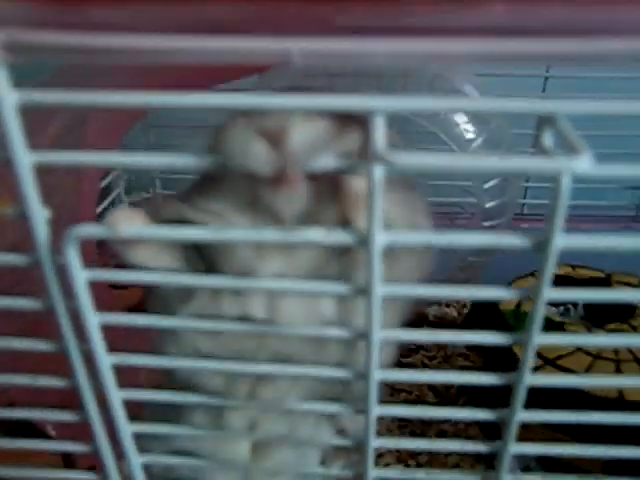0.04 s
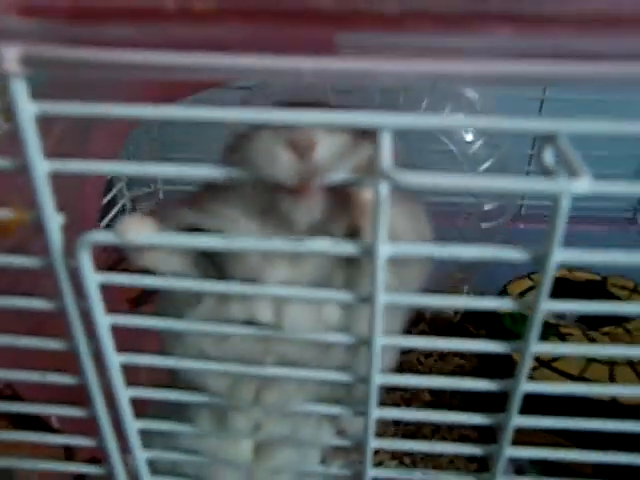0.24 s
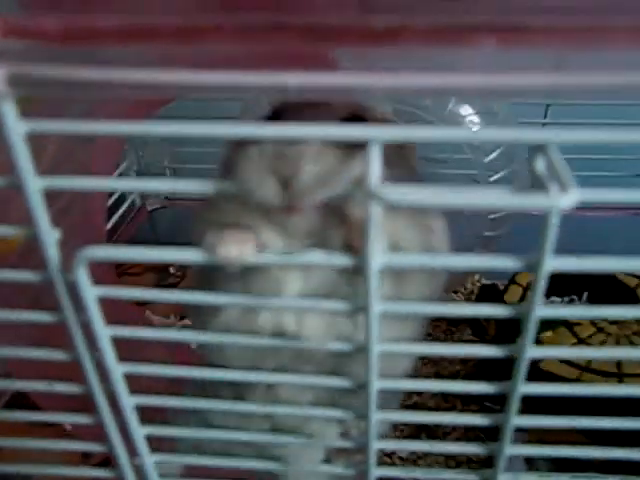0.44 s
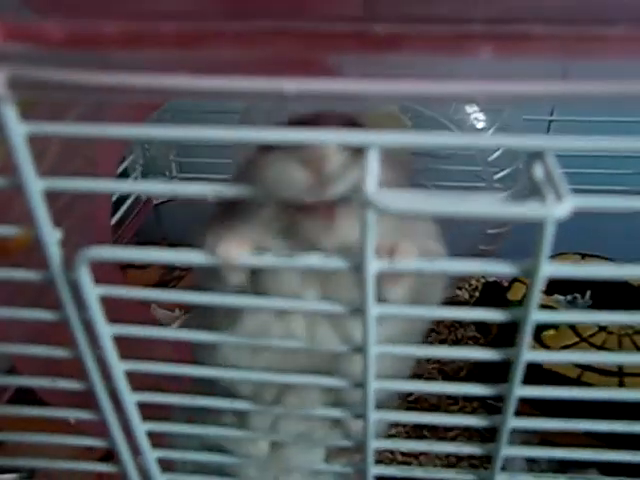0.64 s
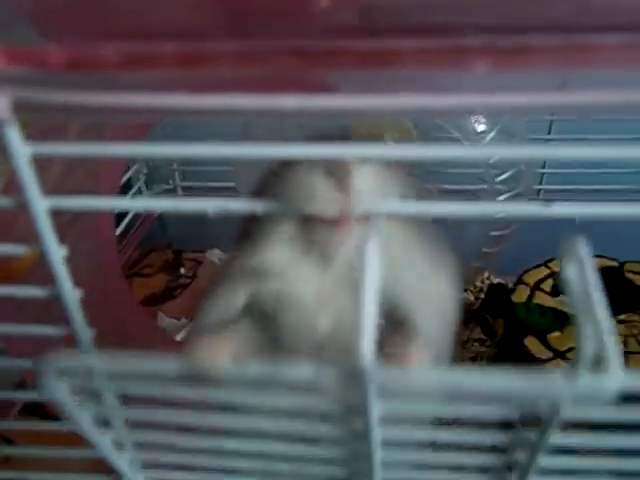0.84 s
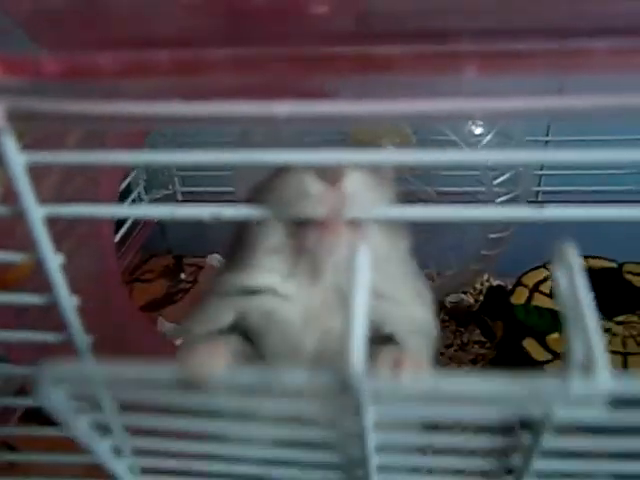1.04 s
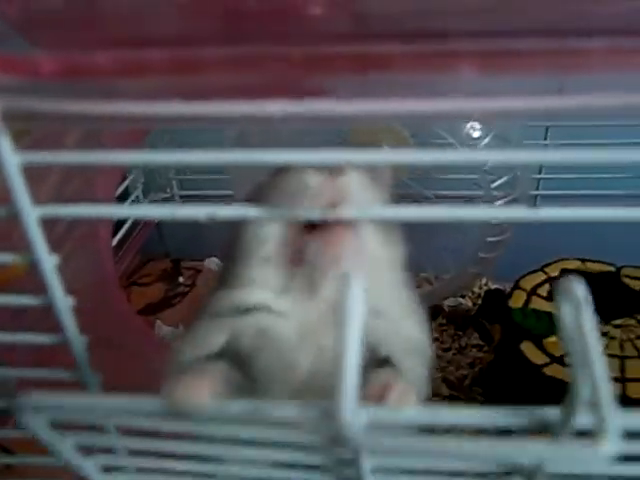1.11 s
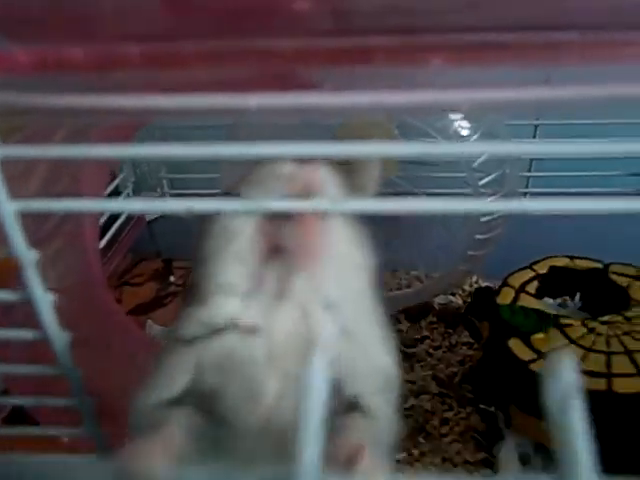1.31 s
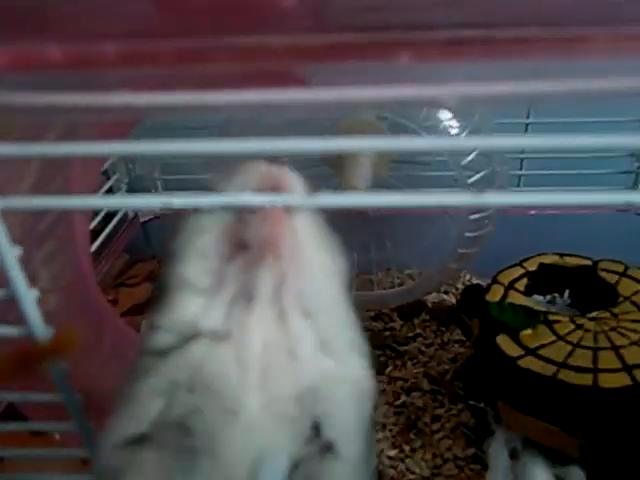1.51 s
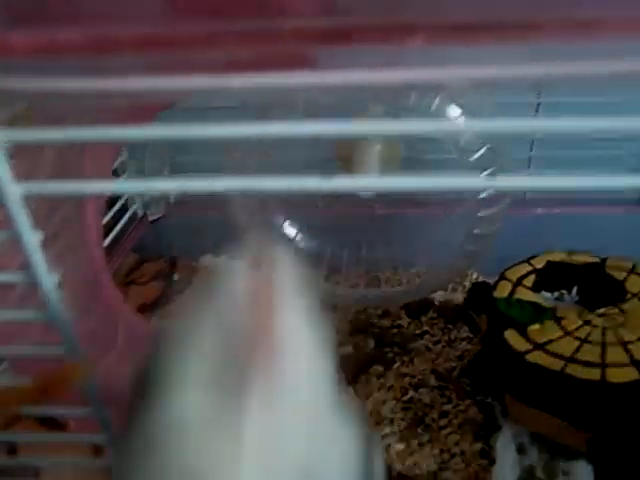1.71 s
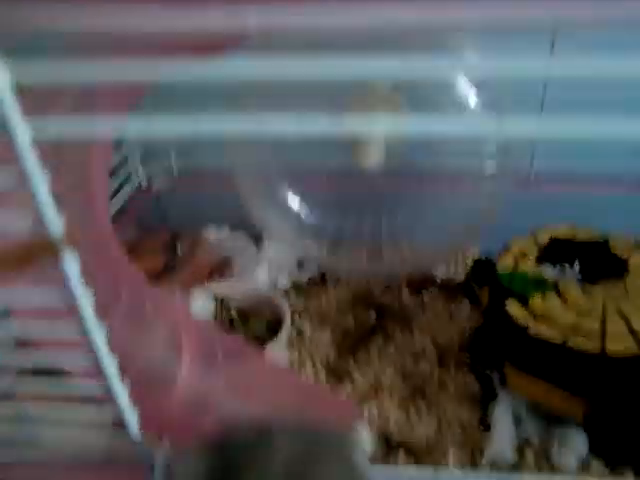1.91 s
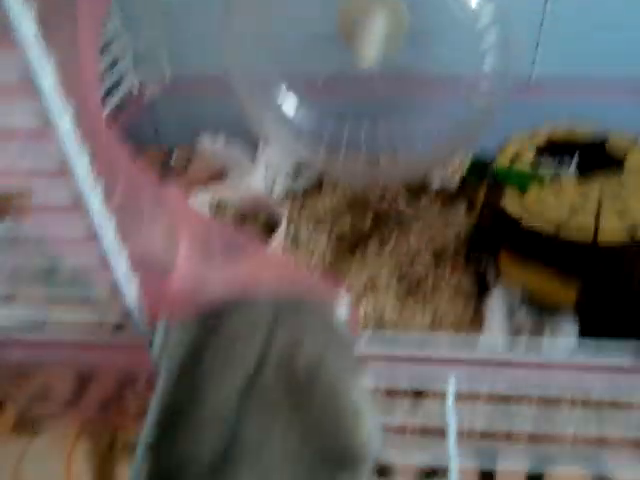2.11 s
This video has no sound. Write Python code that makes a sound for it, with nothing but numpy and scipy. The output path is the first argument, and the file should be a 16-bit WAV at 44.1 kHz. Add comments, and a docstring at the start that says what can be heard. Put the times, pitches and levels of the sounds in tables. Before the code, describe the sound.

A wire cage door rattles and clicks as a hamster tugs at it, then springs free with a loud, ringing clank. Light paw taps and a heavy knock follow, close by in a small room.

```python
"""Over the low rumble of a small room, a hamster tugs at the wire door of its cage, close by.
The door chatters in its catch, each impact exciting damped modes of door and bars; dry ticks and
dull knocks of the plastic tub fall in between. Near 0.8 s the door slips free and lands with a clank,
and the bars ring on, beating against one another. From 1 s paws tap the bars among a few more ticks,
and near 1.84 s a last heavy knock sets the tub and the cage vibrating."""
import sys
import numpy as np
from scipy import signal
from scipy.fft import rfft, irfft, next_fast_len
from scipy.io import wavfile

SR = 44100
rng = np.random.default_rng(int(sys.argv[2]) if len(sys.argv) > 2 else 0)


def store_pcm(level_fs):
    """Save levels as 16-bit WAV."""
    pcm = np.round(np.clip(level_fs, -1, 1) * 32767).astype(np.int16)
    wavfile.write(sys.argv[1], SR, np.atleast_2d(pcm).T)


N = 94815

# background noise spectrum: f/Hz, relative level/dB
AIR_SPECTRUM = [(12, -1), (20, -8.5), (109, -7), (161, -6.5), (196, -10.5), (252, -13), (565, -21),
                (906, -19), (1300, -24), (2470, -30), (2920, -31), (4950, -34.5), (15500, -40)]
# blows on the door: t/s, level/dB, bass/dB, treble/dB, ring of the bars/dB, decay time factor
DOOR_BLOWS = [(0.0, -27.5, 1.5, -4.5, -3.5, 0.85), (0.063, -31.5, 3, -2.5, -5, 0.85),
              (0.098, -30.5, -4, -9, -10, 0.97), (0.136, -36.5, 8, -10.5, -9, 1.06),
              (0.196, -34.5, -1.5, -1, -17, 1.06), (0.2115, -27.5, 4.5, -5, -23, 0.92),
              (0.292, -27.5, -4, -1, -8, 1.03), (0.3712, -23, -1.5, 1, -4, 0.86),
              (0.519, -35, 9, -11, 4, 1.36), (0.582, -23.5, 3, -3.5, -4.5, 0.81),
              (0.727, -43, 13.5, -10, -8, 1.4), (0.731, -42, 12.5, -19, -8, 1.3),
              (0.747, -37, 7, -18, -16, 1.24), (0.784, -16.5, -5, 2, -3.5, 1),
              (0.819, -30, 5, 0.5, 12, 2.1), (0.8321, -10.5, 3, -2.5, 0, 0.63),
              (0.864, -29.5, 5, -12, 4.5, 1.3), (1.8395, -18, 12.5, -6.5, -3.5, 1.07)]
# crowded modes of the whole cage: f/Hz, relative level/dB
CLATTER_SPECTRUM = [(100, -22), (220, -9.5), (400, -12.5), (700, -1), (1100, -4), (1700, -6), (2400, -4),
                    (3100, -4), (3550, -3.5), (5200, -5), (6800, -4.5), (9000, -7), (10200, -4.5),
                    (11500, -5), (15500, -7.5)]
# their decay: f/Hz, T60/s
CLATTER_DECAY = [(300, 0.15), (1000, 0.23), (3000, 0.18), (7000, 0.11), (15000, 0.036)]
# modes of the door held in its catch: f/Hz, level/dB, T60/s
LATCHED_MODES = [(955, -29, 0.41), (1294, -16.5, 0.21), (1375, -17.5, 0.18), (1686, -10, 0.13),
                 (1763, -8.5, 0.1), (1752, -25, 0.38), (2126, -24.5, 0.22), (2823, -13, 0.14),
                 (3452, -6.5, 0.053), (3547, -9, 0.074), (3695, -11, 0.083), (4250, -15, 0.085),
                 (4590, -13.5, 0.082), (6690, -2, 0.033), (8300, -18, 0.1), (9700, -20, .15),
                 (10130, -23, .16), (10100, -30, 0.26), (11800, -19, .08)]
# long modes of the bars: f/Hz, level/dB, T60/s, detuning to either side/Hz
BAR_CLUSTERS = [(408.4, -35, 0.91, 7.5), (861, -33, 0.78, 27.9), (1177, -32.5, 1.23, 29),
                (1894, -20.5, 0.62, 45.4), (2030, -31, 1.15, 48), (2892, -20, 0.49, 66),
                (3186, -35.5, 1.25, 60), (3660, -46, 0.89, 54), (5420, -21, 0.27, 170),
                (6280, -37, 0.5, 130), (8500, -27.5, 0.25, 160), (9940, -28.5, .27, 330)]
# reverberation of the room: f/Hz, relative level/dB
REVERB_SPECTRUM = [(100, -14), (400, -9), (1000, -5.5), (3000, -9.5), (6000, -27.5), (15000, -9)]
# its decay: f/Hz, T60/s
REVERB_DECAY = [(200, 0.92), (1000, 0.26), (3000, 0.38), (12000, 0.16)]
# dry ticks: t/s, level/dB, bass/dB, treble/dB, decay time factor
DRY_TICKS = [(0.1602, -29, 6, -2, 0.44), (0.173, -37, -9, 2, 0.64), (0.227, -18, -24, -4, 0.81),
             (0.5375, -23, 7, -10, 0.45), (1.4876, -32.5, 19.5, 12, 0.67), (1.637, -35.5, -7, 2, 0.62),
             (1.688, -43, -12, 6.5, 1), (1.8402, -20, 10, 6, 0.94), (1.9338, -18.5, -12, -1.5, 0.86)]
# broad resonances of a tick: f/Hz, relative level/dB
TICK_SPECTRUM = [(150, -22), (600, -5.5), (1000, -7), (1400, -2.5), (1850, -1.5), (2200, -11), (2780, 0),
                 (3350, -10), (3950, -5.5), (5000, -9), (6500, -15.5), (15500, -14)]
# their decay: f/Hz, T60/s
TICK_DECAY = [(600, 0.025), (3000, 0.027), (12000, 0.012)]
# knocks passed to the tub: t/s, level/dB, decay time factor, frequency factor
TUB_KNOCKS = [(0.5165, -28, 0.71, 1.003), (0.575, -28.5, 0.77, 1.15), (1.4872, -29.5, 0.32, 0.84),
              (1.8356, -23.5, .8, 1.04), (1.8401, -15.5, 1, 0.97)]
# modes of the plastic tub: f/Hz, level/dB, T60/s
PLASTIC_MODES = [(234, -20, 0.28), (450, -15.5, 0.31), (555, -1.5, 0.049), (690, 5.5, 0.023),
                 (702, -3.5, 0.16), (786, -5.5, 0.077)]
# release, landing and bounce of the door: t/s, level/dB
DOOR_JOLTS = [(0.787, -29), (0.834, -27), (0.861, -19.5)]
# modes of the door swinging free: f/Hz, level/dB, T60/s
FREE_DOOR_MODES = [(1238, -7, .11), (1912, -19, .4), (2847, 0, .25), (2879, -11, .28), (2982, -17, .42)]
# modes of the cage front: f/Hz, level/dB, T60/s
FRONT_MODES = [(300, -14, .22), (515, -2, .1), (757, -4, .13), (1205, -6, .18), (1308, -3, .15),
               (1435, -2, .15), (1626, 1, .15), (2091, -3, .17), (2380, -8, .14), (3150, -5, .17),
               (3484, -1, .085)]
# paw taps: t/s, level/dB, bass/dB, treble/dB
PAW_TAPS = [(1.014, -38.5, 6.5, -7), (1.166, -37.5, 3.5, -3), (1.351, -48, 9, -17), (1.442, -46, 7.5, 4),
            (1.462, -44.5, -5, 9), (1.7505, -25.5, -10.5, -5)]
# modes of a tapped bar: f/Hz, level/dB, T60/s
PING_MODES = [(765, -3, 0.074), (1344, -7, 0.11), (1840, -9.5, 0.08), (1770, -11, 0.11), (3480, -2, 0.065),
              (3580, -5, 0.039)]
# noise of a tap: f/Hz, relative level/dB
TAP_SPECTRUM = [(150, -15), (500, 0), (900, 3), (1700, -4), (2600, -7.5), (3900, -8.5), (4900, -20.5),
                (8000, -24), (15000, -28)]

DEEP_HZ, BASS_HZ, MID_LOW_HZ, MID_HIGH_HZ, TREBLE_HZ = 110, 570, 1730, 3270, 7040  # contact tone corners
ATTACK_S, RING_S = 0.0017, 0.8  # time constant of an impact's rise; duration kept of its ring


def undb(db):
    """Amplitude ratio of a level in decibels."""
    return 10 ** (np.asarray(db) / 20)


def curve_at(points, hz):
    """Interpolation of (frequency, value) points on a logarithmic frequency axis."""
    freqs, values = np.array(points, float).T
    return np.interp(np.log(hz + 1e-3), np.log(freqs), values)


def add(out, start, sound):
    """Superposition: a sound adds to the mix from its start time."""
    i = max(int(start * SR), 0)
    out[i:i + len(sound)] += sound[:len(out) - i]


def noise(colour, size):
    """Spectral shaping of white noise, scaled to unit rms."""
    gain = undb(curve_at(colour, np.fft.rfftfreq(size, 1 / SR)))
    shaped = irfft(rfft(rng.standard_normal(size)) * gain, size)
    return shaped / shaped.std()


def rise(t, tau):
    """Exponential build-up with time constant tau."""
    return 1 - np.exp(-t / tau)


def fade(t, t60):
    """Damping: exponential decay by 60 dB in t60 seconds."""
    return np.exp(-np.log(1000) * t / t60)


def dense_modes(t, colour, t60s, length=1, count=9):
    """Modal overlap: crowded modes merge into noise, each band decaying at its own rate."""
    spectrum, hz = rfft(noise(colour, len(t))), np.fft.rfftfreq(len(t), 1 / SR)
    centres = np.geomspace(100, 16000, count)
    out = np.zeros(len(t))
    for centre, weights in zip(centres, np.eye(count)):
        band = irfft(spectrum * curve_at(list(zip(centres, weights)), hz), len(t))
        out += band * fade(t, length * curve_at(t60s, centre))
    return out


def ring(t, modes, length=1):
    """Free vibration: a sum of damped sinusoids, here with random phases."""
    phases = rng.uniform(0, 2 * np.pi, len(modes))
    return sum(undb(db) * fade(t, t60 * length) * np.sin(2 * np.pi * hz * t + phase)
               for (hz, db, t60), phase in zip(modes, phases))


def contact(x, bass_db, treble_db):
    """Minimum-phase filtering: heavy contacts have more bass, soft ones less treble."""
    size = next_fast_len(2 * len(x))
    tone = [(DEEP_HZ, 0), (BASS_HZ / 2, bass_db), (BASS_HZ, bass_db),
            (MID_LOW_HZ, 0), (MID_HIGH_HZ, 0), (TREBLE_HZ, treble_db)]
    gain = undb(curve_at(tone, np.fft.rfftfreq(size, 1 / SR)))
    cepstrum = irfft(np.log(gain), size)
    cepstrum[1:size // 2] *= 2  # folding onto positive time makes the filter causal
    cepstrum[size // 2:] = 0
    return irfft(rfft(x, size) * np.exp(rfft(cepstrum)), size)[:len(x)]


def room_tone(air_db=-48.5, hum_hz=62.5, hum_db=-61.5):
    """Stationary background: broadband rumble and hiss with a faint sinusoidal mains hum."""
    hum = np.sin(2 * np.pi * hum_hz * np.arange(N) / SR)
    return undb(air_db) * noise(AIR_SPECTRUM, N) + undb(hum_db) * hum


def wire_door(clatter_db=0.5, door_db=2, bars_db=1, reverb_db=-15):
    """Impulse excitation: each blow sets cage, door, bars and room into free decay."""
    out, t = np.zeros(N), np.arange(next_fast_len(int(RING_S * SR))) / SR
    for start, db, bass_db, treble_db, ring_db, length in DOOR_BLOWS:
        clatter = undb(clatter_db) * dense_modes(t, CLATTER_SPECTRUM, CLATTER_DECAY, length)
        door = undb(door_db) * ring(t, LATCHED_MODES, length)
        ringing = undb(bars_db + ring_db) * bars(t)
        reverb = undb(reverb_db) * dense_modes(t, REVERB_SPECTRUM, REVERB_DECAY)
        blow = (clatter + door + ringing + reverb) * rise(t, ATTACK_S)
        add(out, start, undb(db) * contact(blow, bass_db, treble_db))
    return out


def bars(t, count=5):
    """Beating: nearly equal bars ring together at slightly different frequencies."""
    out = np.zeros(len(t))
    for hz, db, t60, spread in BAR_CLUSTERS:
        detuning = spread * (2 * (np.arange(count) + rng.random(count)) / count - 1)
        phase = 2 * np.pi * ((hz + detuning[:, None]) * t + rng.random((count, 1)))
        out += undb(db) * fade(t, t60) * np.sin(phase).sum(0) / np.sqrt(count)
    return out


def ticks(attack_s=0.00014):
    """Brief contacts have broad spectra: small hard ticks die quickly and leave the bars still."""
    out, t = np.zeros(N), np.arange(SR // 10) / SR
    for start, db, bass_db, treble_db, length in DRY_TICKS:
        tick = dense_modes(t, TICK_SPECTRUM, TICK_DECAY, length) * rise(t, attack_s)
        add(out, start, undb(db) * contact(tick, bass_db, treble_db))
    return out


def tub(attack_s=0.0013):
    """Damped low modes: the plastic tub knocks at a pitch that depends on where it is hit."""
    out, t = np.zeros(N), np.arange(SR // 2) / SR
    for start, db, length, pitch in TUB_KNOCKS:
        modes = [(hz * pitch, mode_db, t60) for hz, mode_db, t60 in PLASTIC_MODES]
        add(out, start, undb(db) * ring(t, modes, length) * rise(t, attack_s))
    return out


def clank(landing_s=0.833, landing_db=-18.5, door_attack_s=0.0019):
    """A collision excites both bodies: the freed door rings, strikes the cage front and bounces."""
    out, t = np.zeros(N), np.arange(int(RING_S * SR)) / SR
    add(out, landing_s, undb(landing_db) * ring(t, FRONT_MODES) * rise(t, ATTACK_S))
    for start, db in DOOR_JOLTS:
        add(out, start, undb(db) * ring(t, FREE_DOOR_MODES) * rise(t, door_attack_s))
    return out


def paws(noise_db=-3, bars_db=-2):
    """Soft contact excites high modes weakly: padded paws draw short pings from the bars."""
    out, t = np.zeros(N), np.arange(next_fast_len(int(RING_S * SR))) / SR
    for start, db, bass_db, treble_db in PAW_TAPS:
        ping = ring(t, PING_MODES)
        pat = undb(noise_db) * dense_modes(t, TAP_SPECTRUM, CLATTER_DECAY, length=0.91)
        tap = (ping + pat + undb(bars_db) * bars(t)) * rise(t, ATTACK_S)
        add(out, start, undb(db) * contact(tap, bass_db, treble_db))
    return out


def scene():
    """Linear superposition: the pressures from room and cage add at one point."""
    return (room_tone() + wire_door() + ticks() + tub() + clank() + paws())[None]


def record(dry, ceiling=0.72, cutoff_hz=15900):
    """Soft saturation rounds the loudest peaks; a low-pass filter limits the bandwidth."""
    rounded = dry / (1 + (dry / ceiling) ** 4) ** 0.25
    return signal.sosfilt(signal.ellip(10, 0.2, 80, cutoff_hz, fs=SR, output="sos"), rounded)


dry = scene()
out = record(dry)
store_pcm(out)
```